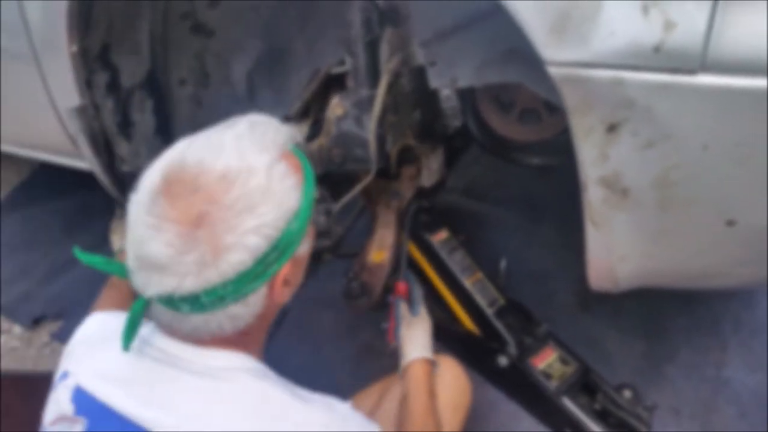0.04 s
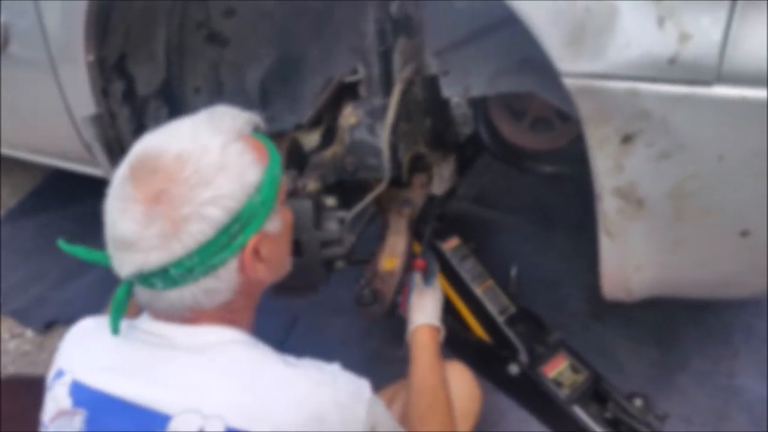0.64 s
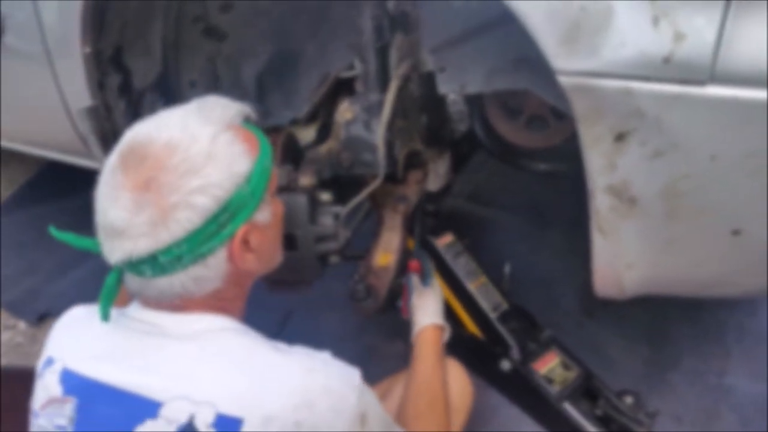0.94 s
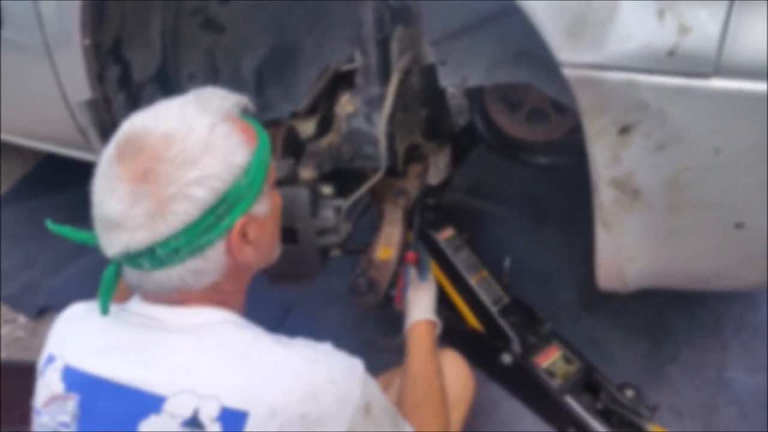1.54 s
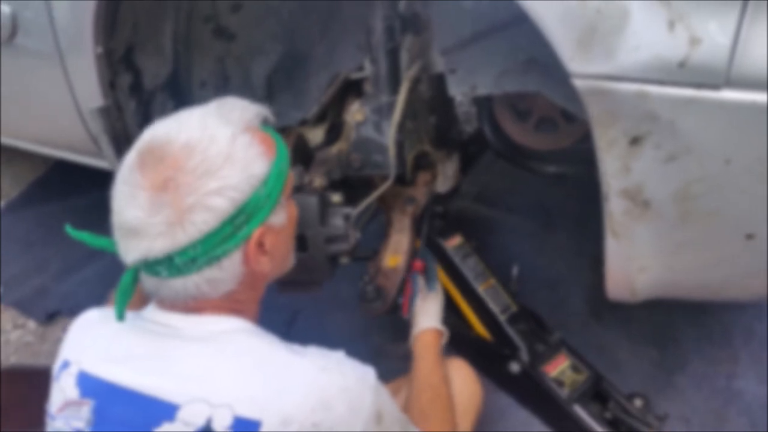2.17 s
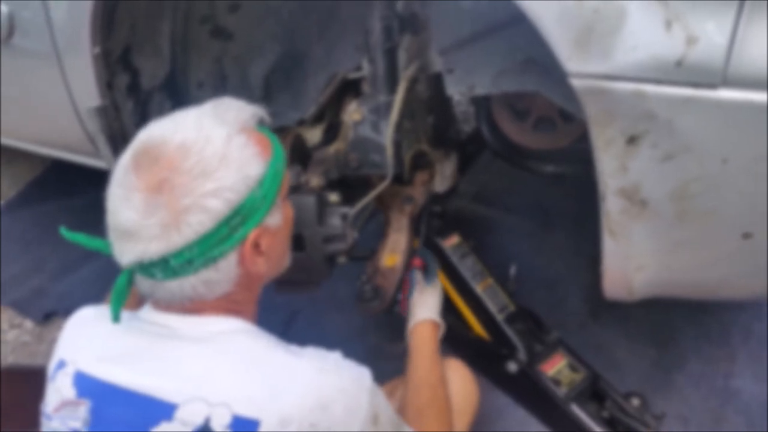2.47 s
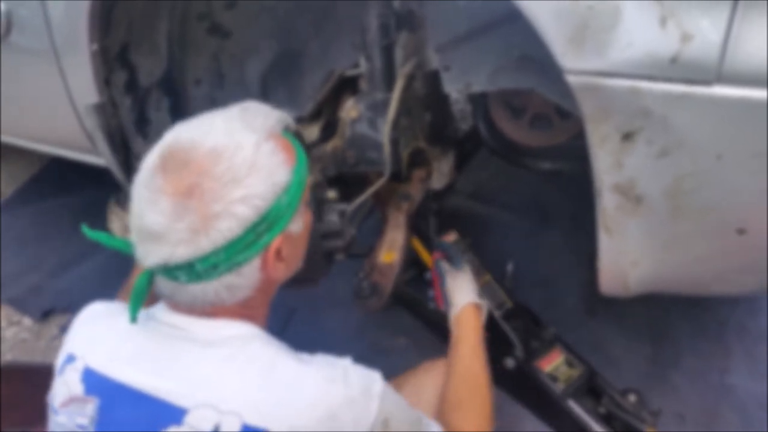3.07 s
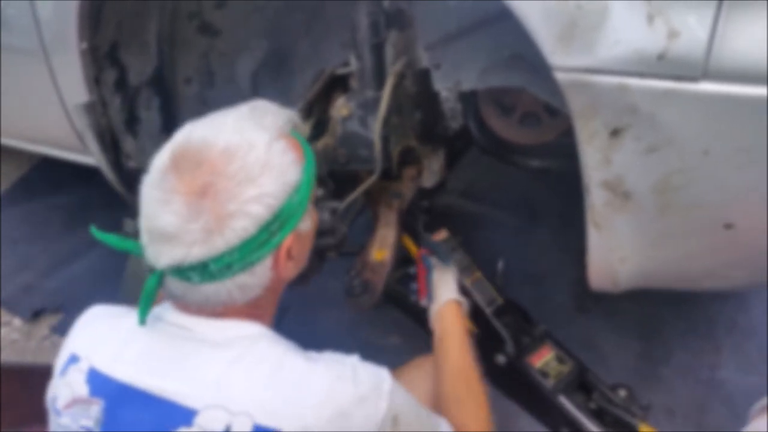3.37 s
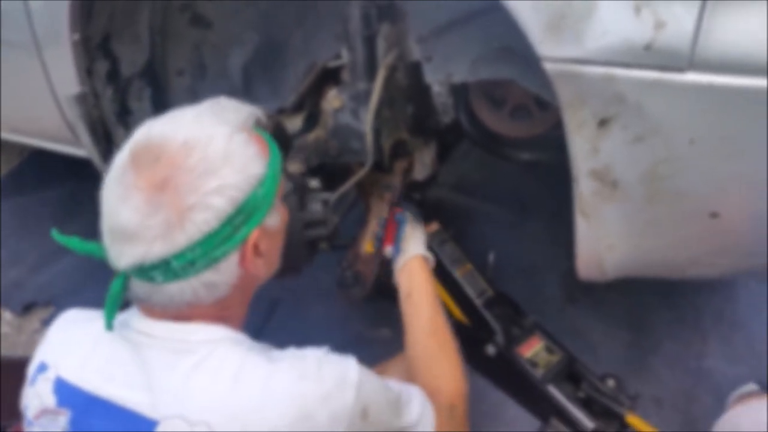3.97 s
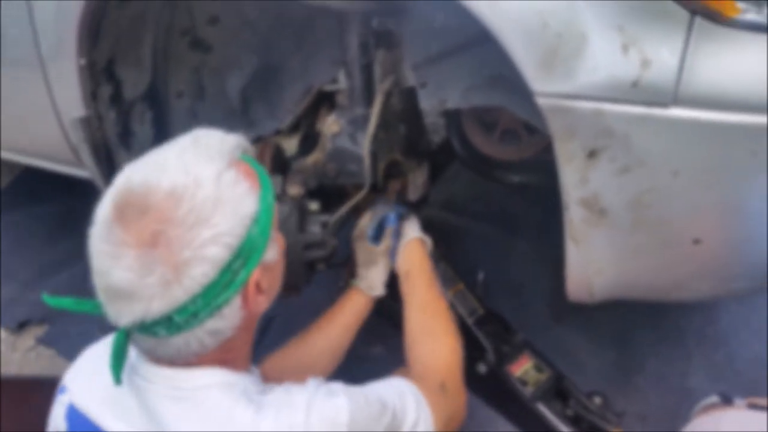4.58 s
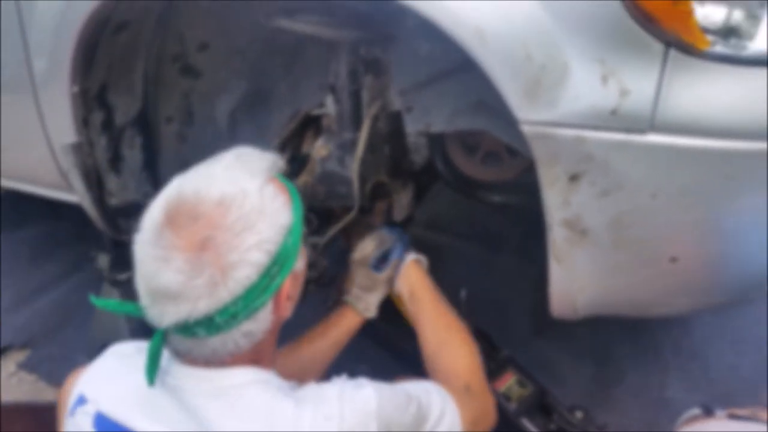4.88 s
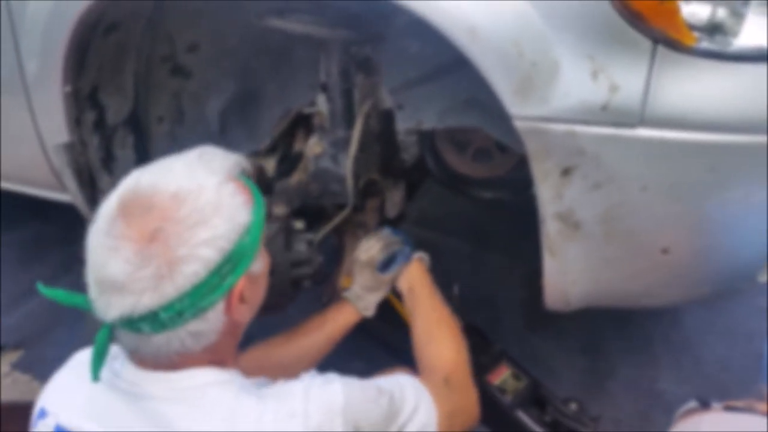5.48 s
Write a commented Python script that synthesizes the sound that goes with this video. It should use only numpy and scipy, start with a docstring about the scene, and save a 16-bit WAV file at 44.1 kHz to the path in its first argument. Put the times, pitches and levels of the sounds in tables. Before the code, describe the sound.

Steel suspension parts click and clack irregularly as they are worked into place on a car resting on a floor jack. Brief rubs, soft thumps against the body and one tiny dry squeak come in between. Gloves brush faintly over the metal, then a part seats with a loud hollow knock and a short scrape. A distant engine hum and faint hiss sit behind it, outdoors.

```python
"""Steel in the wheel well

Outdoors, suspension parts are worked into place on a car that rests on a floor jack. Loose steel
clicks, clacks and thumps the body, with rubs and one dry squeak in between. Gloves brush the parts;
at last one seats with a hollow knock and a short scrape. Behind it: distant engine hum, faint hiss."""
import sys
import numpy as np
from scipy import signal
from scipy.fft import rfft, irfft
from scipy.io import wavfile
from scipy.ndimage import uniform_filter1d

SR = 44100
rng = np.random.default_rng(int(sys.argv[2]) if len(sys.argv) > 2 else 0)


def materialize(psi):
    """Save the field psi as 16-bit PCM at rate SR to the path in sys.argv[1].

    A 1-D psi becomes a single channel; in a 2-D psi each row is a channel.
    """
    bounded = np.clip(np.atleast_2d(psi).T, -1, 1)
    quanta = np.round(bounded * 32767).astype(np.int16)
    wavfile.write(sys.argv[1], SR, quanta)


N = 247842
RING_SIZE = 16384
TIME, AGE = np.arange(N) / SR, np.arange(RING_SIZE) / SR  # scene clock, time since a hit

# open-air spectrum: f/Hz, level/dB
AIR_COLOUR = [(15, -40), (25, -8.5), (97, -2), (134, -3), (175, -12), (317, -18.5), (1650, -25),
              (2690, -30.5), (4370, -30.5), (5000, -25), (6380, -40.5), (8590, -27), (12500, -26.5),
              (14800, -19.5), (16000, -17)]
# engine partials: f/Hz, level/dB
ENGINE_PARTIALS = [(74.5, -62.5), (100, -77), (121, -68.5)]
# steel-on-steel hits: t/s, ring level/dB, brightness/(dB per octave), body thump/dB,
# nominal t60/s, the small part's share of the ring (0-1), leading mode f/Hz
CLICKS = [(0.35, -41.5, -1, -53, .12, 0.7, 2850), (0.5193, -37.5, -3.5, -54.5, .12, 0.15, 1758),
          (0.577, -45.5, -4, -64.5, .11, 0.15, 1663), (0.777, -54, -2, -58, .083, 0, 1850),
          (0.806, -41.5, 2, -61, 0.049, .6, 2740), (0.817, -45.5, 2.5, -48, 0.091, 0.7, 9470),
          (0.855, -64, 7, -57.5, 0.062, 0.1, 9350), (0.899, -41.5, -0.2, -51.5, 0.074, 0.53, 2793),
          (1.1132, -39, 3.5, -57.5, 0.068, 0.97, 3956), (1.157, -67, 2.5, -54, .07, 0, 760),
          (1.295, -50.5, 3, -57, 0.096, .5, 1800), (1.432, -65.5, 8, -70, .035, 0.4, 8470),
          (1.452, -67.5, 8, -66, 0.033, 0.7, 11530), (1.58, -51.5, -0.5, -56, 0.031, .5, 1830),
          (1.666, -58.5, -8.5, -71, 0.053, 0.2, 1740), (1.729, -45, -6, -56, 0.087, 0.12, 1650),
          (1.796, -41.5, 0.5, -51.5, 0.066, 0.55, 3875), (1.808, -51, 5.5, -47, 0.073, 0.2, 620),
          (1.936, -53, 2.5, -57, 0.029, 0.43, 3890), (1.973, -54, -2.7, -58.5, 0.09, .15, 938),
          (2.056, -55.5, 6.5, -56.5, 0.063, 0.22, 11100), (2.105, -46, 0, -54, 0.089, 0.75, 3910),
          (2.148, -51.5, -1.5, -51, 0.083, 0.3, 1340), (2.191, -59, 3.5, -53.5, 0.031, 0.3, 5620),
          (2.833, -44.5, 0.9, -63, 0.066, 0.85, 2880), (3.055, -64, -9, -68, 0.045, 0, 920),
          (3.1984, -37.5, 2.5, -53.5, 0.073, 0.04, 10260), (3.203, -41.5, 4.5, -65, 0.053, 0.15, 6000),
          (3.211, -40.5, 2, -56, .14, 0.2, 1700), (3.251, -51, 0.5, -62, 0.18, .15, 1656),
          (3.332, -50, 0, -55, .14, .13, 340), (3.361, -43, 1, -43, 0.066, .18, 370),
          (3.43, -42.5, -2.5, -56, 0.14, 0.05, 2950), (3.536, -35.5, -3, -49.5, 0.071, 0.11, 4070),
          (3.736, -42, -5, -42.5, 0.091, .54, 1316), (4.073, -42.5, -0.8, -47.5, 0.12, 0.35, 956),
          (4.096, -45, -1.5, -48.5, 0.24, 0.23, 1234), (4.138, -58, 0, -49, 0.046, 0.4, 350)]
# edges of a hit's six bands, the thump lowest: f/Hz
BAND_EDGES = [150, 600, 1300, 2300, 5500, 11000, 16000]
# an average hit's ring in the five bands above the thump: level/dB
STEEL_BALANCE = [-7, 0, -1, -3.5, -7]
# modes of the small loose part: f/Hz, level/dB, t60/s
SMALL_PART_MODES = [(1183, -4, 0.1), (1840, 4, 0.077), (2860, 5, 0.06), (3850, 12, 0.049),
                    (5063, -3, 0.061), (8180, 9, 0.019), (8870, 6, 0.04), (10470, -18, 0.04)]
# modes of the jack's arm and the suspension it bears on: f/Hz, level/dB, t60/s
ARM_MODES = [(238.8, -5.5, 0.42), (340.4, -11, 0.22), (422.3, -3.5, 0.3), (620.6, -8, 0.23),
             (759.7, -8, 0.19), (859.4, 4, 0.11), (934, 4.5, 0.11), (1280, -18, .09), (1503, -2, 0.099),
             (1641, 8, 0.073), (1727, -2, 0.16), (3453, 6, 0.1), (3620, 1, 0.048), (4144, 2.5, 0.089),
             (4670, -6, 0.15), (5906, -14, 0.11), (7600, -13, 0.14), (8500, -14, 0.13),
             (9980, -13.5, 0.074), (9560, -8.5, 0.079), (10320, -25, 0.045)]
# dense clatter of all the other steel: f/Hz, level/dB
CLATTER_COLOUR = [(150, 0.5), (380, 1.5), (560, -2), (950, 0), (1700, 5.5), (2250, -5.5), (3000, 3),
                  (4200, 5), (5600, -10), (7000, -8.5), (9400, -8), (12000, -26), (16000, -30)]
# hollow modes of the car's body: f/Hz, level/dB, t60/s
BODY_MODES = [(158.4, -5, 0.14), (248.3, -1.5, 0.16), (313, 6, 0.07), (390, 2, 0.065), (436, -8.5, 0.077),
              (768, -9, 0.044), (955, -13, 0.051)]
# strokes of steel dragged over steel: t/s, length/s, level/dB
RUBS = [(0.582, .17, -58), (0.686, 0.24, -58), (0.808, 0.24, -51.5), (1.13, 0.063, -54),
        (1.255, 0.077, -54.5), (1.587, 0.14, -54.5), (1.813, 0.22, -58), (2.1, 0.17, -53.5),
        (3, 0.18, -67.5), (3.322, 0.17, -52.5), (4.1, 0.33, -66)]
# rubbing spectrum: f/Hz, level/dB
RUB_COLOUR = [(100, 2), (250, 0), (550, -1.5), (950, 1), (1550, 2), (2400, -8), (3900, -8), (6500, -28),
              (9500, -8.5), (16000, -63.5)]
# dry steel squeaking: t/s, length/s, f/Hz, level/dB
SQUEAKS = [(1.902, 0.039, 4360, -54.5)]
# glove strokes: t/s, length/s, level/dB
BRUSHES = [(4.517, 0.11, -60), (4.765, 0.16, -61)]
# cloth spectrum: f/Hz, level/dB
BRUSH_COLOUR = [(500, -18), (1500, 12), (2400, -11), (4000, 1), (6500, -6), (9500, 3.5), (15000, -16)]
# blows as the part seats: t/s, thud level/dB, clack level/dB
SEATING_BLOWS = [(5.4383, -37, -36), (5.4431, -22, -51), (5.4545, -34.5, -51), (5.465, -30.5, -42),
                 (5.479, -36, -47)]
# spectrum of the scrape's grit: f/Hz, level/dB
SCRAPE_COLOUR = [(300, 14), (1200, -32), (1800, 4.5), (2900, -19), (4100, 2.5), (5200, 1), (6100, -5),
                 (6900, -6), (7800, 0), (9600, 5), (11500, -2), (16000, -1.5)]
# modes of the sliding part: f/Hz, level/dB, t60/s
SLIDE_MODES = [(1830, -11, 0.026), (3420, -7, 0.015), (4190, -3, 0.017), (5460, -2.5, 0.018),
               (5960, -3, 0.037), (7630, -3, 0.024), (9000, -0.5, 0.027), (9500, -3, 0.023),
               (9650, -2, 0.048), (10830, -3, .02), (11650, -9, 0.029)]
# stereo balance: f/Hz, left minus right level/dB
LEAN = [(60, -4.5), (300, -4.5), (1200, -4), (2500, -3.0), (5000, -5.0), (8500, 1), (14000, -5)]


def undb(db):
    """Decibels to gain."""
    return 10 ** (np.asarray(db) / 20)


def unit(x):
    """Scale to rms 1."""
    return x / np.sqrt(np.mean(x ** 2))


def unit_hit(x):
    """Scale a hit so that its energy, spread over 30 ms, has rms 1."""
    return x / np.sqrt(np.mean(x ** 2) * x.shape[-1] / SR / .03)


def attack(rise_s):
    """The contact force takes a moment to build."""
    return 1 - np.exp(-AGE / rise_s)


def fade(t60):
    """Decay by 60 dB in t60 seconds."""
    return np.exp(-np.log(1000) * AGE / t60)


def add(out, s, x):
    """Mix a sound in at s seconds."""
    start = int(s * SR)
    out[:, start:start + x.shape[-1]] += x[:, :N - start]


def walk(rate_hz):
    """Smooth random modulation with a spread near 1."""
    hold = int(SR / rate_hz)
    steps = np.repeat(rng.standard_normal(N // hold + 1), hold)
    return 1.3 * uniform_filter1d(uniform_filter1d(steps, hold), hold)[:N]


def colour(x, points):
    """EQ a sound along a curve of f/Hz, level/dB."""
    hz, db = np.transpose(points)
    f = np.maximum(np.fft.rfftfreq(x.shape[-1], 1 / SR), 1)
    return irfft(rfft(x) * undb(np.interp(np.log(f), np.log(hz), db)), x.shape[-1])


def width(hz):
    """Side against mid: long waves reach both microphones alike."""
    return 0.73 * hz / np.hypot(hz, 1100) + 0.23


def noise(size):
    """White stereo noise, narrow in the bass and wide in the treble."""
    mid, side = rfft(rng.standard_normal((2, size)))
    spread = width(np.fft.rfftfreq(size, 1 / SR))
    return irfft(np.array([mid + spread * side, mid - spread * side]) / np.hypot(1, spread), size)


def open_air(level_db=-54.5):
    """A bed of outdoor rumble and faint hiss, barely wavering."""
    return unit(colour(noise(N), AIR_COLOUR)) * undb(level_db + .5 * walk(3.4))


def engine(waver_db=4):
    """A distant engine hums: its partials drift in pitch together and swell separately."""
    drift = 1 + 0.02214 * walk(7.6)
    return sum(undb(db + waver_db * walk(7.03)) * np.sin(2 * np.pi * np.cumsum(hz * drift) / SR)
               for hz, db in ENGINE_PARTIALS)


def ring(modes, t60_scale=1, scatter_db=3, detune=0.0049):
    """Struck modes; each point of contact weights them differently."""
    out = np.zeros((2, RING_SIZE))
    for hz, db, t60 in modes:
        tuning, phase, side, weight = rng.standard_normal(4)
        wave = np.exp(2j * np.pi * hz * (1 + detune * tuning) * AGE) * fade(t60 * t60_scale)
        stereo_phase = np.pi * phase + 1.26 * width(hz) * side * np.array([[1], [-1]])
        out += undb(db + scatter_db * weight) * (np.exp(1j * stereo_phase) * wave).imag
    return unit_hit(out)


def clack(t60, part_share, rise_s, free_t60=0.087):
    """One contact: a crack, dense clatter and ringing modes, then the wheel well's tail."""
    t60_scale = np.sqrt(t60 / free_t60)  # parts pressed together ring shorter
    small_part = undb(3) * ring(SMALL_PART_MODES, t60_scale, scatter_db=2, detune=0.0012)
    arm = ring(ARM_MODES, t60_scale)
    crack, tail = undb(2) * fade(0.0026), undb(-25) * fade(0.53)
    clatter = unit_hit(colour(noise(RING_SIZE), CLATTER_COLOUR) * (crack + fade(t60) + tail))
    return (clatter + np.sqrt(part_share) * small_part + np.sqrt(1 - part_share) * arm) * attack(rise_s)


def boom(t60):
    """Low reverberation between the ground and the car's floor."""
    band = signal.butter(3, [150, 520], "band", fs=SR, output="sos")
    return unit_hit(signal.sosfilt(band, noise(RING_SIZE) * fade(t60)))


def clicks(rise_s=0.00094, pivot_hz=1730, treble_t60=0.33):
    """Steel hits steel: a harder contact rings brighter, a heavier one thumps the body."""
    out = np.zeros((2, N))
    filters = [signal.butter(3, edges, "band", fs=SR, output="sos")
               for edges in zip(BAND_EDGES, BAND_EDGES[1:])]
    octaves = np.log2(np.sqrt(np.multiply(BAND_EDGES[:-1], BAND_EDGES[1:])) / pivot_hz)
    for s, db, brightness, thump_db, t60, part_share, lead_hz in CLICKS:
        steel = undb(db + np.array(STEEL_BALANCE) + brightness * octaves[1:])
        low_mids = np.hypot(steel[0], undb(thump_db - 1))  # the thump spills one band up
        gains = [undb(thump_db), low_mids, *steel[1:]]
        blow = clack(t60, part_share, rise_s)
        # the highest partials die first
        bands = [unit_hit(signal.sosfilt(sos, blow) * fade(treble_t60 * (BAND_EDGES[-1] / hz) ** 2))
                 for sos, hz in zip(filters, BAND_EDGES[1:])]
        # the lows shake the car's body and linger in the space under it
        hollow = ring(BODY_MODES) * attack(0.013)
        bands[0] = unit_hit(bands[0] + undb(-4) * boom(t60=0.36) + undb(-2) * hollow)
        # where the hit lands picks a leading mode, strongest when the small part rings alone
        lead = unit_hit(ring([(lead_hz, 0, t60)], t60_scale=0.61, detune=0.0015) * attack(rise_s))
        lead_gain = undb(-5 + 5 * part_share) * np.interp(np.log2(lead_hz / pivot_hz), octaves, gains)
        add(out, s, lead_gain * lead + sum(gain * band for gain, band in zip(gains, bands)))
    return out


def stroke(start, length, skew=0.47):
    """A push of the hand swells quickly and eases off slowly."""
    progress = np.clip((TIME - start) / length, 0, 1)
    return np.sin(np.pi * progress ** skew)


def rubbing(grain_db=2):
    """Steel slides unevenly on steel in short, grainy strokes."""
    grains = undb(grain_db * walk(150))
    friction = unit(colour(noise(N) * grains, RUB_COLOUR))
    return friction * sum(undb(db) * stroke(s, length) for s, length, db in RUBS)


def squeak():
    """Dry steel sings one brief, thin note with a jittery pitch."""
    out = np.zeros((2, N))
    for s, length, hz, db in SQUEAKS:
        swell = np.sin(np.pi * np.minimum(AGE / length, 1))
        pitch_hz = hz * (1 + 0.0074 * walk(300)[:RING_SIZE])
        tone = np.sin(2 * np.pi * np.cumsum(pitch_hz) / SR)
        add(out, s, undb(db) * swell * tone * np.ones((2, 1)))
    return out


def gloves(grain_db=3):
    """Cloth swishes softly over the steel as the hands take a new grip."""
    cloth = unit(colour(noise(N) * undb(grain_db * walk(200)), BRUSH_COLOUR))
    return cloth * sum(undb(db) * stroke(s, length) for s, length, db in BRUSHES)


def knock(left_lag_s=0.0002, dull_hz=2000, low_cut_hz=110):
    """The part jolts home in a few quick blows that boom in the body."""
    out = np.zeros((2, N))
    age = np.maximum(AGE - np.array([[left_lag_s], [0]]), 0)
    body = sum(-undb(db) * np.sin(2 * np.pi * hz * age) * fade(t60) for hz, db, t60 in BODY_MODES)
    # the thud carries little deep bass
    low_cut = signal.butter(2, low_cut_hz, "high", fs=SR, output="sos")
    thud = signal.sosfilt(low_cut, unit_hit(body * attack(0.003)))
    dull = signal.butter(2, dull_hz, fs=SR, output="sos")
    for s, thud_db, clack_db in SEATING_BLOWS:
        steel = unit_hit(signal.sosfilt(dull, clack(t60=0.11, part_share=.3, rise_s=0.00084)))
        add(out, s, undb(thud_db) * (thud + undb(-14) * boom(t60=0.29)) + undb(clack_db) * steel)
    return out


def scrape(start_s=5.437, attack_s=0.024, hold_s=0.029, t60=0.12, gain_db=-33.5):
    """Tiny, rapid slips make the sliding part ring; it speeds up, slides home and stops."""
    slips = noise(N) * undb(2.5 * walk(900))
    grit = unit(colour(slips, SCRAPE_COLOUR))
    resonance = ring(SLIDE_MODES, t60_scale=0.96, scatter_db=-1.5, detune=0.00091)
    sing = unit(signal.fftconvolve(slips, resonance, axes=1)[:, :N])
    age = TIME - start_s
    speed = np.clip(age / attack_s, 0, 1)
    release = np.exp(-np.log(1000) * np.maximum(age - attack_s - hold_s, 0) / t60)
    return (undb(-1) * grit + undb(-3) * sing) * undb(gain_db) * speed ** 2 * release


def scene():
    """The work on the steel, mixed over the outdoor bed."""
    return clicks() + rubbing() + squeak() + knock() + scrape() + open_air() + engine() + gloves()


def record(dry, top_hz=15900):
    """The image leans right, except around 8.5 kHz; the very top is cut steeply."""
    left = colour(dry[0], [(hz, db / 2) for hz, db in LEAN])
    right = colour(dry[1], [(hz, -db / 2) for hz, db in LEAN])
    high_cut = signal.ellip(10, .2, 80, top_hz, fs=SR, output="sos")
    return signal.sosfilt(high_cut, undb(-.5) * np.array([left, right]))


dry = scene()
out = record(dry)
materialize(out)
```